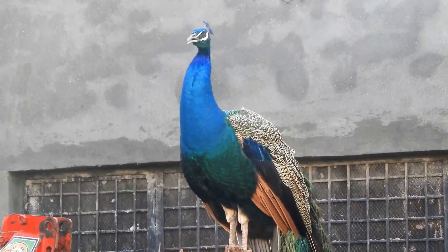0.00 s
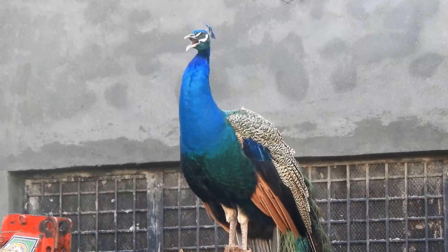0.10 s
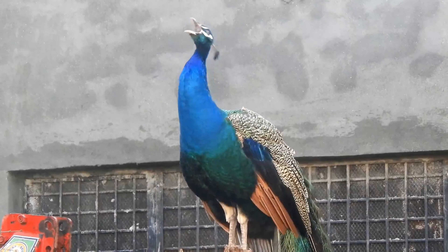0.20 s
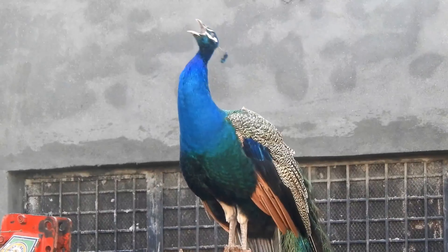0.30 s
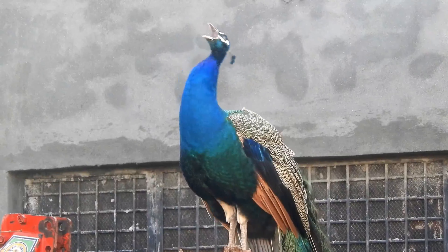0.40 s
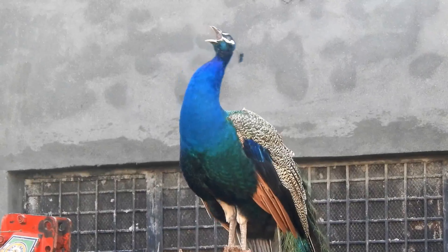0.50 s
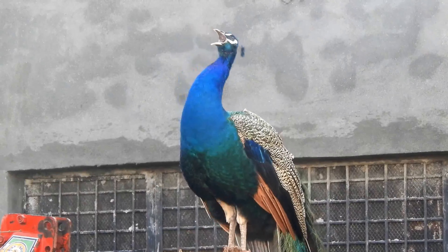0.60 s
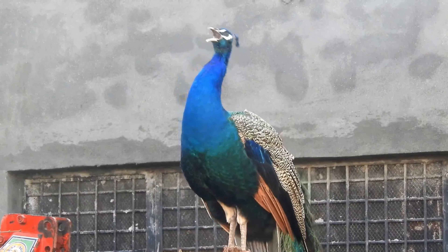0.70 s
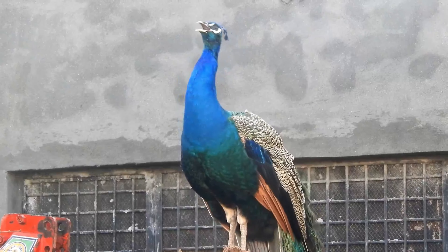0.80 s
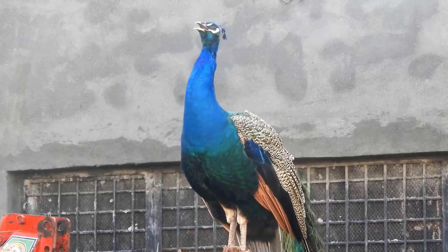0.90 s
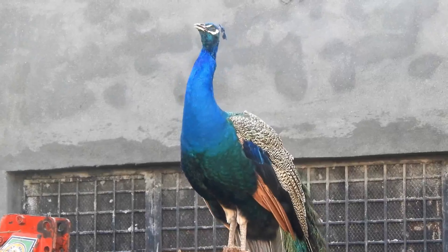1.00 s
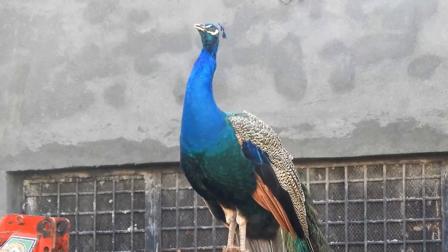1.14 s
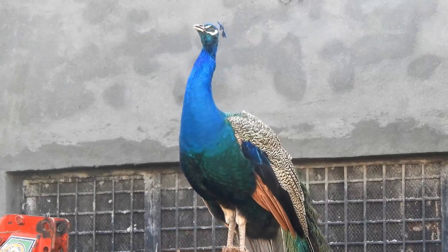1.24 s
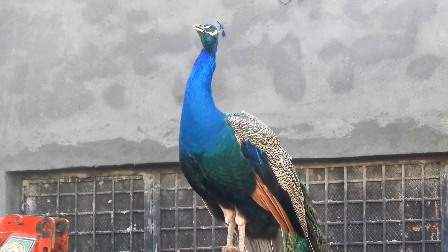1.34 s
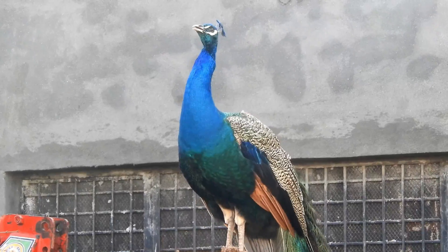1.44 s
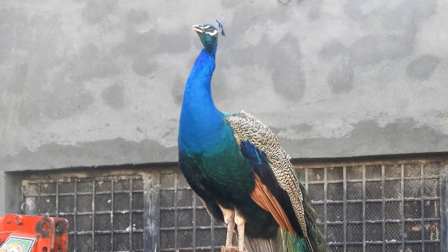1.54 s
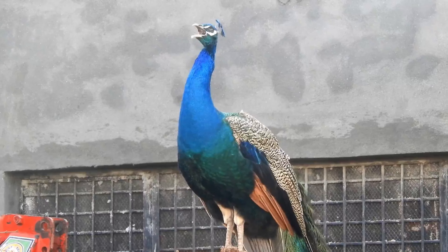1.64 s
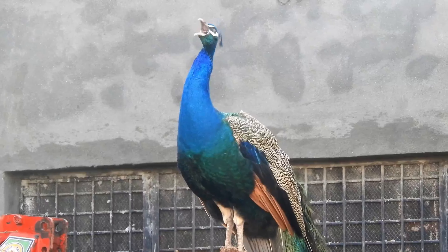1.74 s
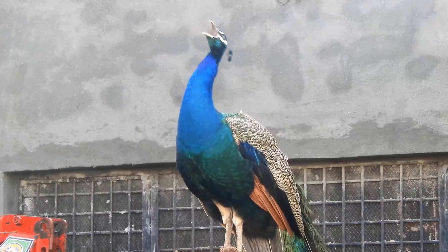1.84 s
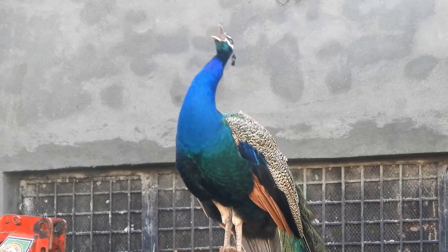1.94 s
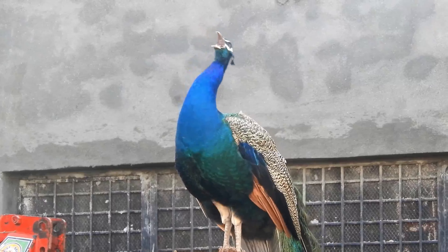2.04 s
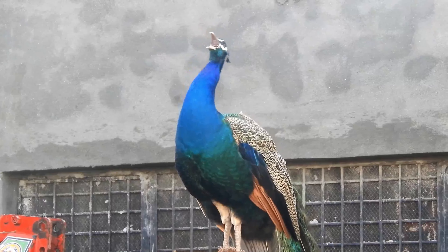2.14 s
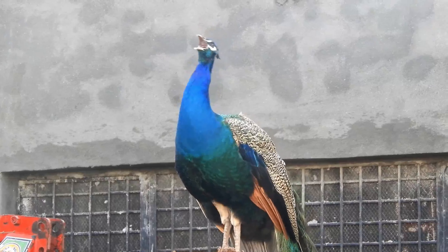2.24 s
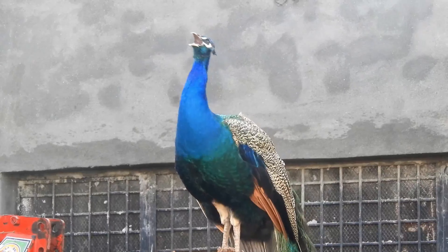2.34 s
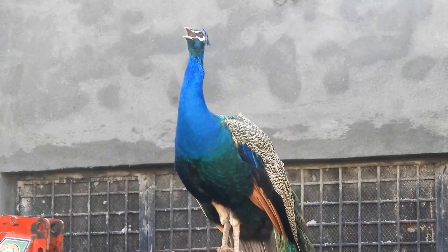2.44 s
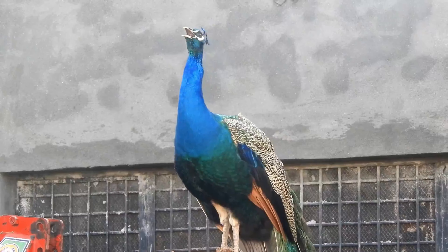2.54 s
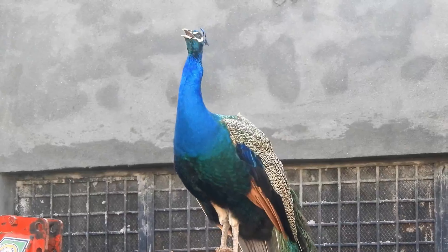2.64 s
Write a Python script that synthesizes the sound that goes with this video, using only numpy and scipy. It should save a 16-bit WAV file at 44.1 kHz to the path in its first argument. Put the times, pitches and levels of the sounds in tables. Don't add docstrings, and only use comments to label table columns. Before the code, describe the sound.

A peacock close to the microphone cries loudly twice, each call bending upward and falling quickly at the end; nearby walls echo, with faint bird whistles between calls and low distant traffic rumble.

```python
import sys
import numpy as np
from scipy import signal
from scipy.fft import rfft, irfft, next_fast_len
from scipy.io import wavfile
from scipy.ndimage import uniform_filter1d, map_coordinates

SR = 44100
rng = np.random.default_rng(int(sys.argv[2]) if len(sys.argv) > 2 else 0)


def transcribe(u):
    v = np.clip(np.atleast_2d(u).T, -1, 1)
    q = np.round(v * 32767).astype(np.int16)
    wavfile.write(sys.argv[1], SR, q)


def field_ratio(decibels):
    return 10 ** (np.asarray(decibels, dtype=float) / 20)


N = 119070


def unit(x):
    return x / np.sqrt(np.mean(x ** 2) + 1e-20)


def along(points, hz):
    point_hz, value = np.transpose(points)
    return np.interp(np.log(hz + 1), np.log(point_hz + 1), value)


def wobble(rate_hz, count):
    return map_coordinates(rng.standard_normal(400), [np.arange(count) * rate_hz / SR])


def filtered(x, response):
    size = next_fast_len(N + 8192)
    return irfft(rfft(x, size) * response(np.fft.rfftfreq(size, 1 / SR)), size)[..., :N]


# pitch_hz, likeness (1 = mono)
LIKENESS = [(30, .9), (150, .9), (300, 0.42), (3000, 0.98), (12000, .6)]


def stereo_noise(gain):
    def response(hz):
        angle = np.arccos(np.clip(along(LIKENESS, hz), -1, 1)) / 2
        return gain(hz) * [np.cos(angle), np.sin(angle)]

    mid, side = filtered(rng.standard_normal((2, N)), response)
    return unit(np.array([mid + side, mid - side]))


# start_s, level_db
RUMBLE_LEVEL = [
    (0.0, -48),
    (0.2, -45),
    (0.62, -57.5),
    (0.75, -65.5),
    (1.46, -57),
    (1.65, -53),
    (2.23, -54),
    (2.44, -56.5),
    (2.7, -57.5),
]
# pitch_hz, level_db
RUMBLE_TONE = [(12, -31.5), (20, 0.5), (27, -3), (53, 1.5), (172, 4), (299, -11), (600, -11), (780, -51),
               (1320, -120)]
# pitch_hz, level_db
AIR_TONE = [(290, -32), (500, -7.5), (1220, -11.5), (1350, -5), (1820, -16), (2220, -7.5), (2360, -18.5),
            (4370, -8.5), (15400, -26)]
# pitch_hz, width_hz, level_db
EARLIER_CALL = [(1110, 40, -8), (1670, 50, 8), (1800, 300, -4), (4150, 50, -6)]


def background():
    t = np.arange(N) / SR
    level_db = np.interp(t, *np.transpose(RUMBLE_LEVEL))
    rumble = stereo_noise(lambda hz: field_ratio(along(RUMBLE_TONE, hz)))
    rumble = field_ratio(level_db + 0.5 * wobble(16, N)) * rumble

    air = stereo_noise(lambda hz: field_ratio(along(AIR_TONE, hz)) / (1 + (hz / 11000) ** 4))
    air = field_ratio(-60 + 0.66 * (level_db - level_db.mean())) * air

    ring = stereo_noise(lambda hz: sum(field_ratio(db) / np.sqrt(1 + (2 * (hz - center) / width) ** 2)
                                       for center, width, db in EARLIER_CALL))
    ring_db, ring_t60_s = -43, 1.3
    return rumble + air + field_ratio(ring_db - 60 * t / ring_t60_s) * ring


# start_s, length_s, start_hz, middle_hz, end_hz
WHISTLES = [(0.881, .17, 5850, 5500, 5100), (1.04, 0.039, 5150, 4800, 4330), (1.138, .04, 4300, 4800, 4650),
            (1.169, .07, 4900, 4700, 3900), (1.291, 0.057, 3700, 4400, 3750),
            (1.295, 0.019, 5200, 5600, 6100), (1.35, 0.055, 5700, 4840, 3670),
            (1.651, 0.093, 6700, 5520, 4250), (1.5, .13, 2230, 2200, 2134), (1.12, .03, 3300, 3600, 4000),
            (1.64, 0.044, 346, 336, 335)]
WHISTLE_DB = [-55, -53, -57, -54, -52, -65, -65.5, -50.5, -63.5, -61, -53.5]
WHISTLE_BLUR = [0.13, .1, .1, .2, .4, .3, 2.5, .2, .6, 0.47, .2]


def songbirds():
    out = np.zeros(N)
    for (start_s, length_s, *hz), db, blur in zip(WHISTLES, WHISTLE_DB, WHISTLE_BLUR):
        u = np.linspace(0, 1, round(length_s * SR))
        glide_hz = np.polyval(np.polyfit([0, .5, 1], hz, deg=2), u)
        size = field_ratio(db) * np.sin(np.pi * u) ** 0.2 * (1 + blur * wobble(400, len(u)))
        whistle = size * np.sin(2 * np.pi * np.cumsum(glide_hz) / SR)
        out[round(start_s * SR):][:len(u)] += whistle
    return out


# pitch_hz, level_db
BEAK_OPEN = [(600, -28.5), (1250, -15.5), (1900, -12), (2500, -17.5), (3200, -20), (3700, -30.5),
             (4400, -30), (6000, -39)]
# pitch_hz, level_db
BEAK_SHUT = [(650, -49), (1050, -11), (1400, -6), (2100, -34), (3600, -44), (4500, -24.5), (5200, -44.5),
             (5950, -30)]


def throat_and_beak(hz, opening, bright):
    shape_db = opening * along(BEAK_OPEN, hz) + (1 - opening) * along(BEAK_SHUT, hz)
    top_db = -29.5 * np.log2(np.maximum(hz / 6115, 1))
    effort_db = 2 * bright * np.log2(np.maximum(hz / 3340, 1))
    gain = field_ratio(shape_db + top_db + effort_db)
    return gain / np.sqrt(np.sum(gain ** 2, 0) / 2)


# start_s, pitch_hz, level_db, beak_opening (0-1), brightness_db_per_octave
FIRST_CALL = [
    (.212, 554.5, -23.5, 0.4, -4),
    (.24, 577.6, -8.5, 1, -4),
    (.31, 617, -9.5, 0.99, 1),
    (.39, 642.8, -8, 0.93, -3),
    (.5, 663, -11.5, .75, -3.5),
    (.6, 677.8, -9, 0.6, 0),
    (.7, 679.6, -4, 0, -3),
    (.76, 655.8, -10.5, 0.28, -4),
    (.787, 564.5, -34, 0.4, 8.5),
]
# start_s, pitch_hz, level_db, beak_opening (0-1), brightness_db_per_octave
SECOND_CALL = [
    (1.74, 547.2, -19.5, -0.23, -12.5),
    (1.79, 573.5, -17, 0.81, -4),
    (1.86, 626.4, -11, 0.98, 1.5),
    (1.96, 651.7, -9, 0.92, -4),
    (2.111, 665.7, -10, 0.72, 0),
    (2.19, 704, -6, 0.23, -1.5),
    (2.29, 738.7, -10, 0.072, -1.5),
    (2.381, 702.4, -7.5, 0.064, -6.5),
    (2.47, 569, -27.5, 0.16, -2.5),
]
# pitch_hz, level_db
BREATH_TONE = [(200, -19.5), (500, -11.5), (1000, 3), (2000, 4.5), (5000, -7.5), (9000, -20.5),
               (15000, -55)]


def peacock():
    attack_s, release_s = 0.0096, .012
    bloom_s = 0.0018
    out = np.zeros(N)
    breath = unit(filtered(rng.standard_normal(N), lambda hz: field_ratio(along(BREATH_TONE, hz))))
    k = np.arange(1, 23)[:, None]
    for rows in (FIRST_CALL, SECOND_CALL):
        s, *columns = np.transpose(rows)
        t = np.arange(s[0], s[-1], 1 / SR)
        since = t - s[0]
        hz, level_db, opening, bright = [uniform_filter1d(np.interp(t, s, c), size=400) for c in columns]
        opening = np.clip(opening, -.2, 1.2)
        jitter = 0.0024 * wobble(90, len(t))
        phase = 2 * np.pi * np.cumsum(hz * (1 + jitter)) / SR

        overtone_hz = k * hz
        gain = throat_and_beak(overtone_hz, opening, bright)
        flutter = np.array([wobble(22.07, len(t)) for _ in k])
        flutter_db = 2 * flutter * np.log2(np.minimum(k, 8))
        notch_db = -18 * np.exp(-((overtone_hz - 2250) / 70) ** 2)
        chest_db = (k == 1) * (t > s[4]) * .55 * np.maximum(-9 - level_db, 0)
        gain = gain * field_ratio(flutter_db + notch_db + chest_db)
        gain = gain * np.clip((since - bloom_s * np.maximum(k - 2, 0)) / attack_s, 0, 1)
        voice = np.sum(gain * np.sin(k * phase + rng.uniform(0, 2 * np.pi, k.shape)), 0)

        at = round(s[0] * SR)
        hiss = field_ratio(-26.5 + 6.2 * (opening - 0.43)) * breath[at:][:len(t)]
        hiss = hiss * (1 + np.cos(phase)) * np.clip(since / (4 * attack_s), 0, 1)
        fade = np.clip((s[-1] - t) / release_s, 0, 1)
        out[at:][:len(t)] += field_ratio(level_db) * fade * (voice + hiss)
    return out


def tail(x, decay, wait_s, length):
    hz, t, bins = signal.stft(rng.standard_normal((2, 60000)), SR, nperseg=256)
    fading = bins * field_ratio(-60 * t / along(decay, hz)[:, None])
    answer = signal.istft(fading, SR, nperseg=256)[1][:, :length]
    answer = answer / np.linalg.norm(answer[0])
    delayed = np.pad(x, (round(wait_s * SR), 0))
    mid, side = signal.fftconvolve(delayed[None], answer, axes=1)[:, :N]
    side = field_ratio(-21.5) * side
    return np.array([mid + side, mid - side])


# delay_s, level_db, pan_db
WALLS = [
    (.004, -15, 5),
    (.009, -15.5, 1),
    (.016, -13.5, .5),
    (.024, -14, -.5),
    (.031, -16.5, 0.5),
    (.045, -21.5, -1),
]
# pitch_hz, t60_s
YARD_DECAY = [(500, 0.63), (1400, 0.21), (2500, 0.2), (5000, .3), (10000, 0.18)]
# pitch_hz, level_db
YARD_TONE = [(600, 6.5), (1400, -3), (2500, 1.5), (5000, 8.5), (10000, 4)]
# pitch_hz, t60_s
HOUSE_DECAY = [(500, .25), (5000, 0.14)]
# pitch_hz, t60_s
FAR_DECAY = [(500, .8), (1400, 1.2), (2200, 1.6), (4000, 0.33), (10000, 0.45)]


def yard(x):
    near = np.array([x, x])
    for delay_s, db, pan_db in WALLS:
        sides_db = db + 0.34 * pan_db * np.array([[1], [-1]])
        near = near + field_ratio(sides_db) * np.pad(x, (round(delay_s * SR), 0))[:N]
    dull = filtered(x, lambda hz: 1 / (1 + (hz / 5000) ** 2))
    toned = filtered(x, lambda hz: field_ratio(along(YARD_TONE, hz)))
    reverb = field_ratio(-18.5) * tail(toned, YARD_DECAY, 0.017, SR // 2)
    house = field_ratio(-25) * tail(dull, HOUSE_DECAY, .13, SR // 2)
    far = field_ratio(-40.5) * tail(dull, FAR_DECAY, 0.11, SR * 2)
    return near + reverb + house + far


# pitch_hz, level_db
PORTS = [(250, -12), (600, -26), (1200, -45), (5000, -40), (8500, -22), (13000, -13)]


def microphone_ports(pair):
    side = filtered(pair.mean(0), lambda hz: 1j * field_ratio(along(PORTS, hz)))
    return pair + [side, -side]


def scene():
    birds = songbirds()
    birds_in_yard = birds + field_ratio(-14) * tail(birds, YARD_DECAY, 0.023, SR // 2)
    return microphone_ports(yard(peacock())) + birds_in_yard + background()


def soft_clip(x):
    ceiling, hardness = 1.0, 47
    return x / (1 + np.abs(x / ceiling) ** hardness) ** (1 / hardness)


def roll_off(x):
    return signal.sosfilt(signal.butter(12, 15590, fs=SR, output="sos"), x)


def record(dry):
    mix = soft_clip(dry)
    return roll_off(mix)


dry = scene()
out = record(dry)
transcribe(out)
```